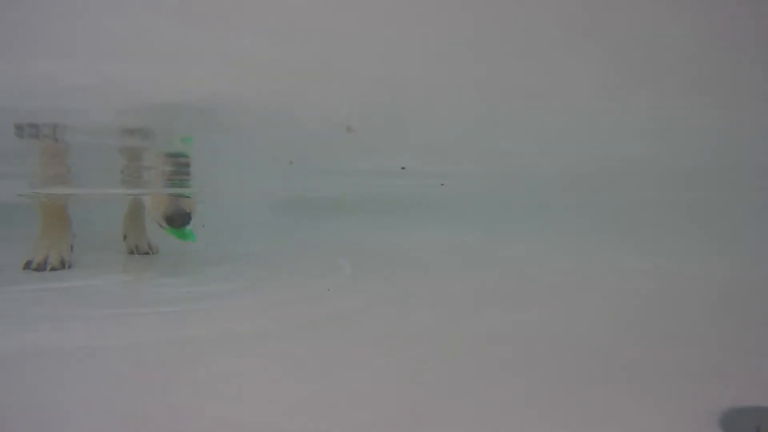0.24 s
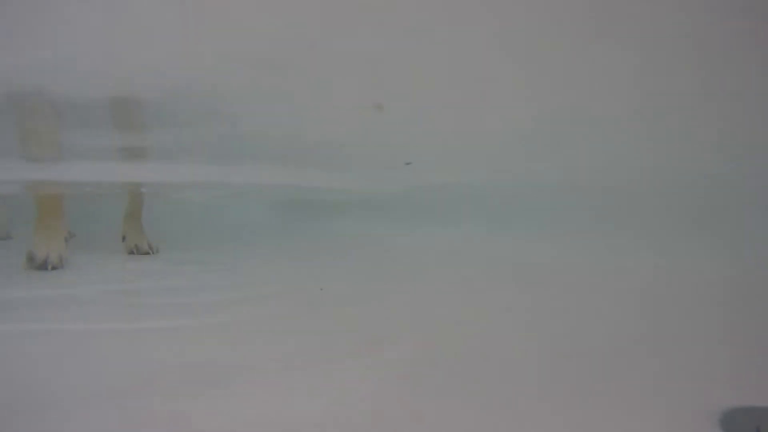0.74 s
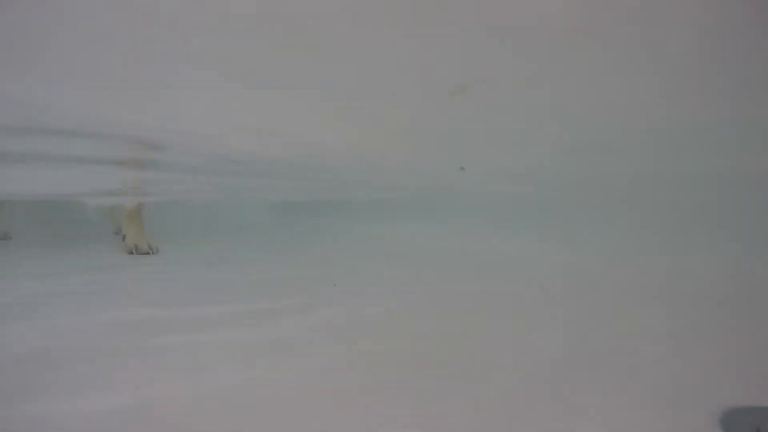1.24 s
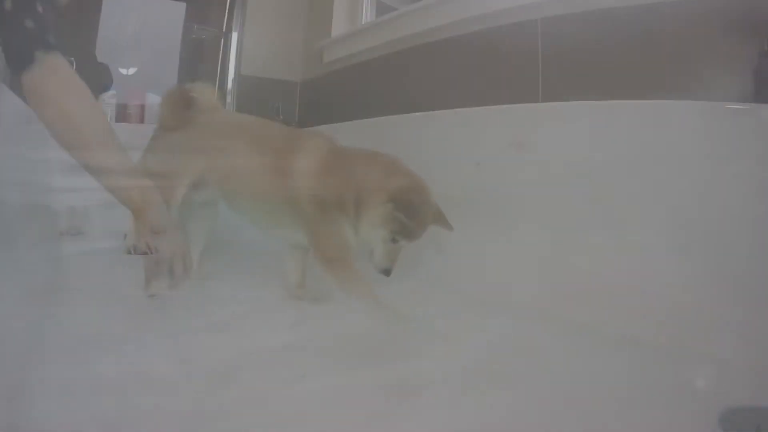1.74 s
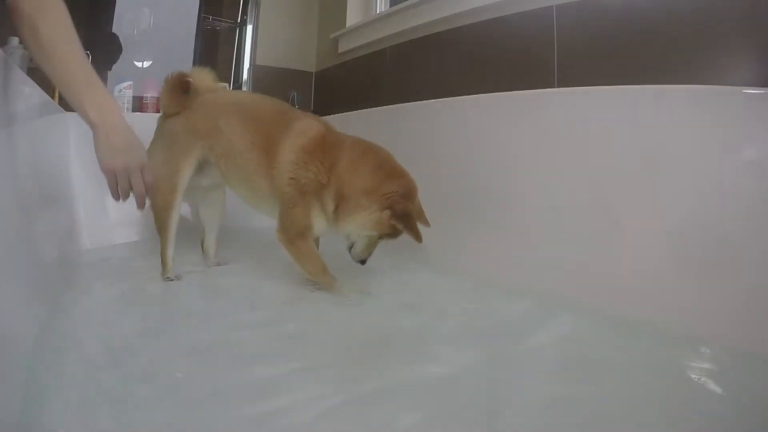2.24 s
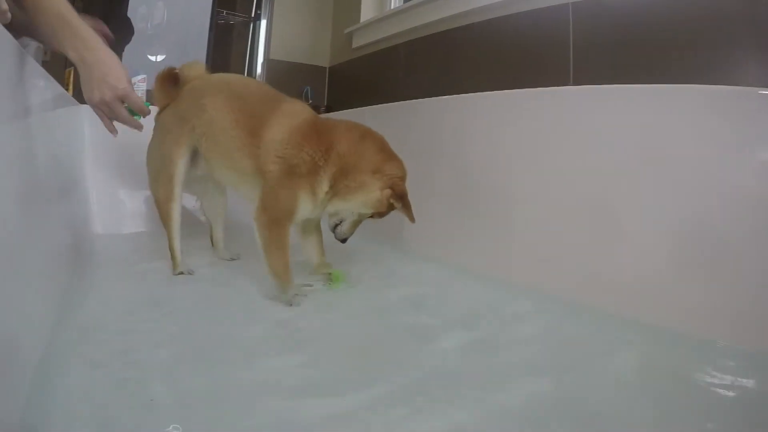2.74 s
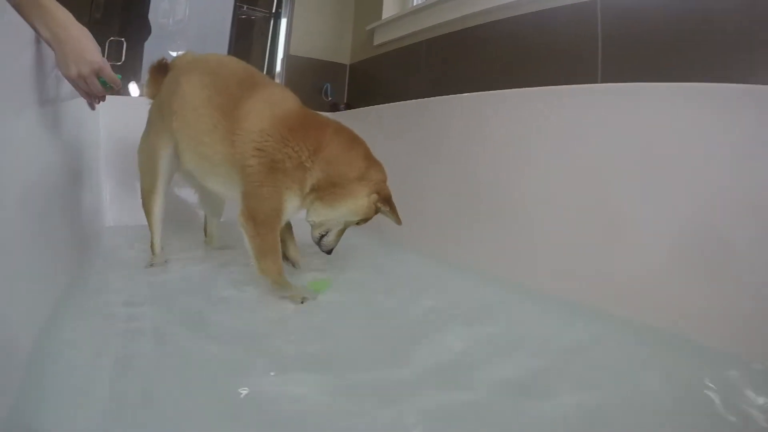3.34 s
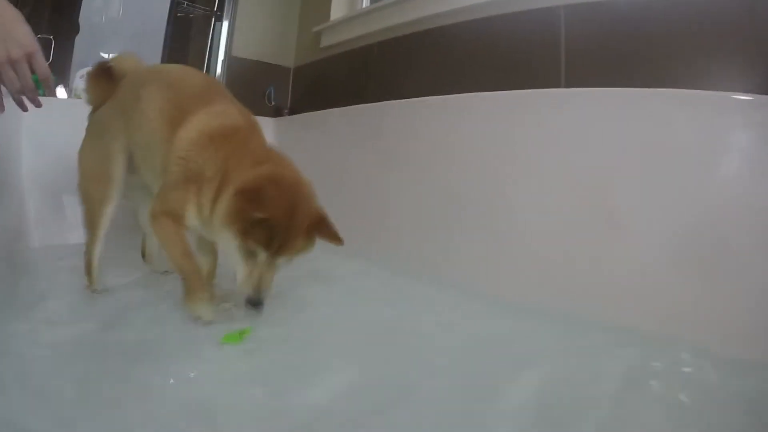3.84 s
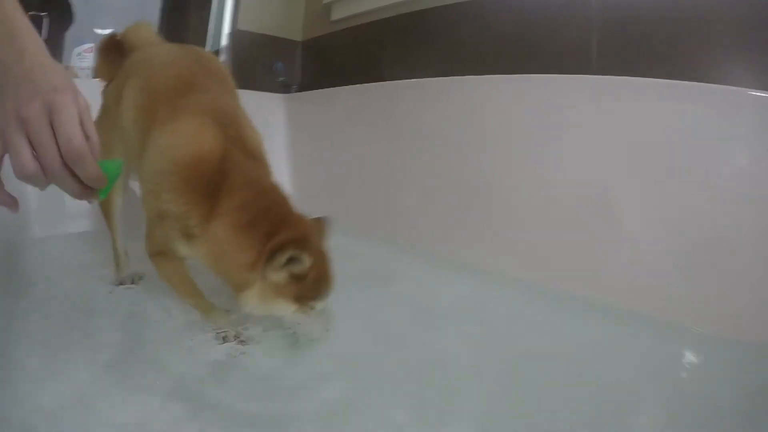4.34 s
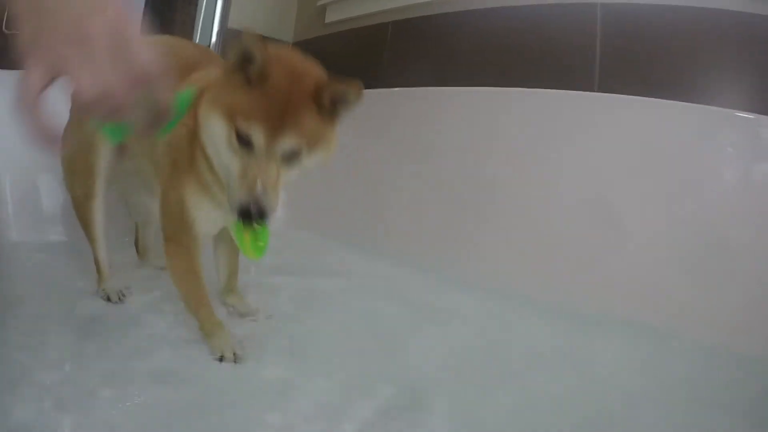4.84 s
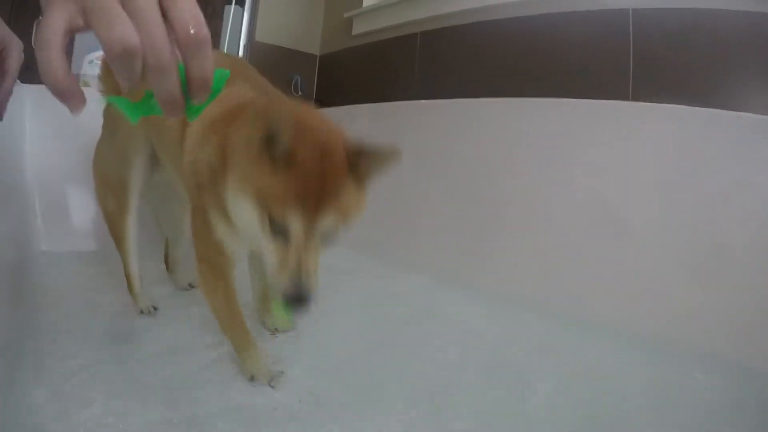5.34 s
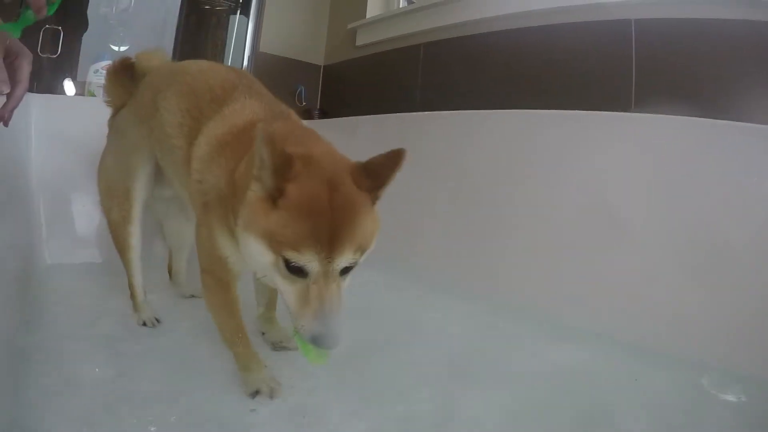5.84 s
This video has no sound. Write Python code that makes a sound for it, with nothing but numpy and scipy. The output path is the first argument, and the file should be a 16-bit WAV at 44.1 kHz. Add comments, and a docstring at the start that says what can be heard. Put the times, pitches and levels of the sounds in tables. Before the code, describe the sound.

Close, boxy and dull underwater-style pickup in a shallow bath. Low water rumble first, then a cluster of strong knocks and watery slops, loudest just before two seconds. Afterwards a motorised toy's tail chatters in a regular left-right rhythm, stumbling briefly as a paw catches it. Light sloshing, bubbles and faint hiss continue beneath; the clicking swells, and several hollow bumps from the dog's movements close the scene.

```python
"""Deep rumble, sloshing, faint dying tones and hiss come first; then a toy fish starts to clack.
Its motorised tail beats left and right about eleven times a second: hinge, shell and hollow body ring.
Random pushes ring thuds and plunks as a dog's paws bump the tub and water slops on a sealed case.
Moving water is banded noise with common surges; bubbles are rising sines, droplets bursts of noise.
All but a few thin snaps is dull, with almost nothing above about 3.9 kHz."""
import sys
import numpy as np
from scipy import signal
from scipy.fft import rfft, irfft
from scipy.io import wavfile
from scipy.ndimage import uniform_filter1d

SR = 44100
rng = np.random.default_rng(int(sys.argv[2]) if len(sys.argv) > 2 else 0)


def store_pcm(level_fs):
    """Save levels as 16-bit WAV."""
    pcm = np.round(np.clip(level_fs, -1, 1) * 32767).astype(np.int16)
    wavfile.write(sys.argv[1], SR, np.atleast_2d(pcm).T)


N = 269451

# Hinge modes: side (0 or 1), ratio to click pitch, mean level/dB
HINGE_MODES = [(0, .76, -12), (0, .87, 3.5), (0, 1, 4.5), (0, 1, -4), (0, 1.31, -5.5), (1, .83, -6),
               (1, 1.4, -4), (1, 1, 6.5), (1, 1.2, -13)]
# Hollow-body modes, one row a side: nominal f/Hz, nominal f/Hz
BODY_MODES_HZ = [(235, 394.5), (270, 500)]
# Tail strokes, one row a side: click level/dB, click f/Hz, shell level/dB, shell f/Hz, body level/dB
# (all nominal)
STROKES = [(-47, 2580, -38.5, 671, -38.5), (-47.5, 2670, -44, 819, -51)]
# Toy louder as it comes nearer: t/s, level/dB
NEARNESS_DB = [(.82, -34), (.9, -46), (1.01, -26), (1.1, -20), (1.45, -12.5), (2.35, -9.5), (2.6, -20.5),
               (2.84, 0), (3.8, -5), (4.3, 1), (4.8, 2.5), (5.15, 2.5), (6.05, 6)]
# Beat stumbles as a paw catches the toy: t/s, lateness/s
STUMBLE_S = [(.83, -.008), (1.08, -.002), (2.6, 0), (2.767, -.021), (2.849, .009), (2.943, 0)]
# Slops and bumps: t/s, spread/s, push level/dB, thud level/dB, thud f/Hz, plunk level/dB, plunk f/Hz,
# slap level/dB (levels before the trims in knocks())
KNOCK_EVENTS = [(.394, 0.002, -70, -46.5, 488, -42.5, 513, -61),
                (0.823, 0.008, -49.5, -43, 300, -51.5, 500, -56),
                (0.86, 0.0013, -40, -36.5, 172, -55, 501, -67),
                (1.038, .0013, -34, -23, 497, -31.5, 515, -47),
                (1.277, .0013, -19.5, -20.5, 226, -39, 525, -47),
                (1.292, 0.011, -37, -29, 215, -25, 544, -43.5),
                (1.308, 0.0043, -24.5, -17.5, 298, -23.5, 640, -35),
                (1.322, 0.004, -27.5, -17.5, 222, -15.5, 494, -34),
                (1.336, 0.0038, -25.5, -23, 249, -25.5, 616, -34),
                (1.378, 0.014, -36, -41, 240, -35.5, 524, -43),
                (1.432, 0.0045, -57.5, -36, 202, -49.5, 566, -50),
                (1.629, 0.0036, -35, -29.5, 200.5, -38, 616, -65.5),
                (1.651, 0.006, -33, -23.5, 204, -29, 665, -40.5),
                (1.711, .0017, -51, -43.5, 295, -25.5, 564, -52),
                (1.725, 0.003, -38, -28, 250, -27.5, 735, -42),
                (1.737, 0.0011, -23.5, -17.5, 238, -28.5, 501, -36.5),
                (1.742, 0.0011, -25.5, -21.5, 244, -31, 675, -44),
                (1.752, 0.0087, -32.5, -28, 432, -35, 657, -44.5),
                (1.778, .0033, -27.5, -37, 161, -42, 527, -47),
                (1.863, 0.0012, -13.5, -8.5, 202, -26, 501, -27.5),
                (1.91, 0.0009, -14, -8.5, 217, -13.5, 522, -24),
                (1.917, .0004, -50, -15, 350, -44, 727, -48),
                (2.019, 0.0099, -48, -37, 476, -28.5, 733, -49),
                (2.039, 0.0056, -45, -40, 269, -28.5, 687, -43.5),
                (2.094, 0.0023, -34, -26.5, 354, -26, 660, -36.5),
                (2.119, 0.0014, -60, -63, 480, -29, 616, -59),
                (2.146, 0.0044, -46, -39.5, 300, -32, 570, -50),
                (2.176, 0.0053, -63.5, -38, 253, -30.5, 588, -50.5),
                (2.324, 0.0024, -58, -40.5, 260, -34.5, 690, -58),
                (2.392, 0.0064, -52, -28, 394, -35.5, 697, -54.5),
                (2.46, 0.016, -52, -41.5, 313, -41.5, 725, -52),
                (2.659, 0.013, -58, -50, 495, -40.5, 557, -56),
                (2.7, 0.0073, -65, -45, 345, -40, 628, -49.5),
                (2.801, 0.0029, -64, -46, 302, -43, 595, -73),
                (3.228, 0.0072, -44.5, -42.5, 214, -56, 510, -72),
                (3.57, 0.0073, -69, -40.5, 195, -52, 690, -56.5),
                (3.874, 0.019, -54, -46.5, 242, -49.5, 592, -63),
                (4, 0.0017, -55, -37.5, 279, -41, 694, -64), (4.117, 0.0024, -62, -47, 258, -41, 670, -57),
                (4.146, 0.0014, -37, -33.5, 183, -66, 501, -67),
                (4.325, 0.027, -52, -43.5, 243, -56.5, 870, -56),
                (4.479, 0.0025, -30, -49, 408, -47.5, 670, -61),
                (4.672, 0.0067, -73, -43, 280, -46.5, 654, -62),
                (5.033, 0.0024, -72.5, -45.5, 314, -47.5, 507, -65.5),
                (5.159, .004, -25.5, -42.5, 476, -26.5, 680, -56),
                (5.179, 0.0097, -35, -40.5, 237, -38.5, 508, -64),
                (5.252, 0.0097, -49, -40, 366, -40, 780, -59),
                (5.343, 0.0029, -59, -43, 217, -40, 740, -58),
                (5.378, 0.0048, -46, -28.5, 170, -30, 665, -66),
                (5.388, 0.0097, -39, -29, 213, -42.5, 650, -67),
                (5.6, 0.0032, -38, -35.5, 227, -41.5, 680, -70),
                (5.764, 0.0072, -46.5, -18.5, 197.7, -31.5, 725, -52),
                (5.777, 0.0019, -38, -37, 230, -19, 630, -71), (5.861, .0036, -43, -32, 219, -26, 710, -48),
                (5.875, 0.0035, -40, -16, 399, -11.5, 477, -38),
                (5.892, 0.0052, -31, -23, 240, -34, 523, -56),
                (5.997, 0.0033, -48.5, -27.5, 197, -40.5, 680, -62.5),
                (6.029, 0.0042, -51, -26.5, 234.5, -21, 766, -50),
                (6.059, 0.0049, -46, -24, 418, -29.5, 547, -48.5),
                (6.086, 0.003, -32, -28.5, 390, -35.5, 675, -59)]
# Colour of tub and case: f/Hz, level/dB
CASE_COLOUR = [(25, -1.5), (100, -15.5), (200, 9), (290, 2.5), (390, 5), (520, -1), (680, 8), (840, -9),
               (980, -5), (1120, -16), (1300, -16), (1650, -28), (1950, -29), (3800, -38.5)]
# Moving water: t/s, rumble level/dB, slosh level/dB (before layer trims)
WATER_LEVELS = [(0.0, -47.5, -67), (0.13, -53.5, -63), (0.37, -54, -65.5), (0.61, -64.5, -61.5),
                (0.85, -74, -65), (1.09, -68, -52.5), (1.21, -51.5, -44.5), (1.38, -58, -47),
                (1.65, -51, -41), (1.8, -41.5, -21.5), (1.96, -45.5, -39), (2.18, -61.5, -47),
                (2.64, -62, -50.5), (2.98, -58, -58.5), (3.66, -64, -55), (3.95, -61, -52.5),
                (4.08, -55.5, -51), (4.25, -56, -52), (4.71, -63.5, -57), (5.07, -67, -60.5),
                (5.31, -58, -49), (5.55, -58.5, -54.5), (5.72, -60, -52), (5.87, -49.5, -52),
                (6.01, -53, -49.5), (6.11, -50, -37)]
# Colour of water in the tub: f/Hz, relative level/dB
SLOSH_COLOUR = [(20, 16), (40, -8), (70, -20.5), (124, -13), (215, -7.5), (300, -11.5), (380, -14),
                (520, -12.5), (700, -9.5), (880, -21), (1000, -15.5), (1130, -27.5), (1300, -23.5),
                (1800, -34.5)]
# Wavelets lapping on the case, brightening the water: t/s, level/dB
LAPPING_DB = [(0, 9.5), (.9, -4.5), (1.3, 2.5), (2.1, 3.5), (2.8, 2), (4.4, 1), (5.3, -2.5), (6.11, -5.5)]
# Drops and small splashes on the case: t/s, level/dB, band centre f/Hz
DROP_EVENTS = [(.73, -63, 2600), (.818, -62, 2700), (1.102, -60, 3340), (1.457, -61, 3320),
               (1.812, -52, 3080), (2.353, -55.5, 2750), (4.121, -57.5, 3880), (4.363, -59, 3700)]
# Thin sharp snaps, bright beyond 3.9 kHz: t/s, level/dB
SNAP_EVENTS = [(.481, -70), (1.037, -57), (2.391, -74)]
# Faint dying tones: f/Hz, initial level/dB, t60/s
RING_TONES = [(455, -40, 0.4), (460, -51, .8), (682, -46, 0.32), (752, -56, 0.4)]
# Deepest rumble, strong at first under water: t/s, mean level/dB
DEEP_DB = [(0, -44.5), (.28, -45), (.55, -51.5), (.66, -71), (1.9, -50.5), (2.3, -67.5), (4.3, -65),
           (4.5, -52), (6.11, -65)]
# Hiss, dipping twice early on: t/s, mean level/dB
HISS_DB = [(0, -69), (.5, -69.5), (.6, -81.5), (.75, -66), (.82, -78), (.92, -78), (1.018, -72.5),
           (1.3, -65), (2, -69), (3, -67.5), (5, -68), (6.11, -66.5)]
# Colour of hiss and droplets: f/Hz, relative level/dB
HISS_TILT = [(600, -4.5), (1000, 2.5), (1700, -3), (3800, -8.5)]

# Toy: first stroke, full beat, delay of the return stroke
TAIL_START_S, BEAT_S, RETURN_S = .733, .17626, .094
CLICK_DETUNE, SHELL_DETUNE = .03, .035  # standard deviation, share of pitch
STROKE_SCATTER_DB, MODE_SCATTER_DB = 1.2, 3.5  # standard deviation
LOW_SHARE = 0.49  # share of the nearness dB followed by shell and body
# Knocks: splash relative to slap, more for a sharp push; case ring relative to slap
SPLASH_DB, SHARP_DB = -22.5, 25
CASE_RING_HZ, CASE_RING_DB = 1990, -21
# Water: layer trims; cap on the slosh level before trim; bubbles relative to uncapped slosh
RUMBLE_DB, SLOSH_DB, RIPPLE_DB, LAP_DB = 5.5, 0, -8, -17
SLOSH_TOP_DB, BUBBLE_DB = -36.5, -3.5
LIFT_S, CLEAR_S = 1.05, 2.6  # case lifted out of the bath between these times
DULL_EDGE_HZ, EDGE_HZ = 3900, 15800  # low-pass edges: dull sounds, output


def amp(db):
    """Decibels to gain."""
    return 10 ** (np.asarray(db) / 20)


def evened(x):
    """Scales to rms 1."""
    return x / np.sqrt(np.mean(x ** 2) + 1e-20)


def crested(x):
    """Scales so that the loudest 5 ms have rms 1."""
    return x / np.sqrt(uniform_filter1d(x ** 2, size=220).max() + 1e-20)


def noise(count):
    """White Gaussian noise."""
    return rng.standard_normal(count)


def curve(t_s, table):
    """Interpolates a two-column table linearly."""
    return np.interp(t_s, *np.transpose(table))


def centred_time(half):
    """Time/s of 2 * half samples, zero in the middle."""
    return np.arange(-half, half) / SR


def add(mix, at_s, sound):
    """Mixes in a sound whose middle falls at at_s."""
    start = round(at_s * SR) - len(sound) // 2
    part = mix[start:start + len(sound)]
    part += sound[:len(part)]


def band(x, lo_hz, hi_hz, colour):
    """Band-passes x and shapes it by a (f/Hz, level/dB) colour, interpolated in log frequency."""
    hz = np.fft.rfftfreq(len(x), 1 / SR) + 1e-3
    colour_hz, colour_db = np.transpose(colour)
    edges = 1 / (1 + (lo_hz / hz) ** 8) / (1 + (hz / hi_hz) ** 12)
    gain = amp(np.interp(np.log(hz), np.log(colour_hz), colour_db))
    return irfft(rfft(x) * edges * gain, len(x))


def drift(rate_hz):
    """Slow random wander of rms 1."""
    hz = np.fft.rfftfreq(N, 1 / SR)
    return evened(irfft(rfft(noise(N)) * np.exp(-(hz / rate_hz) ** 2), N))


def swell(t, rise, decay):
    """Soft rise to t = 0, then exponential decay; rise and decay in s."""
    before = -.5 * (np.minimum(t, 0) / rise) ** 2
    after = -(np.hypot(np.maximum(t, 0), rise) - rise) / decay
    return np.exp(before + after)


def mode(t, hz):
    """Sine of random phase."""
    return np.sin(2 * np.pi * (hz * t + rng.random()))


def toy():
    """Each stroke chatters the hinge for a few ms; shell and hollow body ring slightly later."""
    out, t = np.zeros(N), centred_time(2048)
    beats_s = np.arange(TAIL_START_S, N / SR, BEAT_S)
    strokes = [(s + side * RETURN_S, side) for s in beats_s for side in (0, 1)]
    for at_s, side in strokes[:-1]:  # the last falls past the end
        click_db, click_hz, shell_db, shell_hz, body_db = STROKES[side]
        near_db, late_s = curve(at_s, NEARNESS_DB), curve(at_s, STUMBLE_S)
        force, click_off, shell_off = noise(3)
        click_hz = click_hz * (1 + CLICK_DETUNE * click_off)
        shell_hz = shell_hz * (1 + SHELL_DETUNE * shell_off)

        # hinge modes trade strength from stroke to stroke
        hinge = sum(amp(db + MODE_SCATTER_DB * rng.standard_normal())
                    * mode(t, click_hz * ratio * rng.uniform(1.0, 1.02))
                    for mode_side, ratio, db in HINGE_MODES if round(mode_side) == side)
        grit = evened(band(noise(len(t)), 1900, 4300, [(2000, 1.0), (2900, 4.5), (4000, -19.5)]))
        click = (evened(hinge) + amp(-2.5) * grit) * np.exp(-.5 * (t / 0.0032) ** 2)

        shell = mode(t, shell_hz) + amp(-13.5) * mode(t, shell_hz * 1.307)
        shell = shell * swell(t - .0015, rise=0.0021, decay=0.0045)
        body = sum(mode(t, hz * rng.uniform(0.889, 1.1)) for hz in BODY_MODES_HZ[side])
        body = body * swell(t - .004, rise=0.004, decay=0.0044)
        wake = band(noise(len(t)), 380, 1600, CASE_COLOUR) * swell(t - .008, rise=0.0025, decay=0.0025)
        low = amp(body_db - 5.0) * crested(body)
        low = low + amp(shell_db) * (crested(shell) + amp(-10.0) * crested(wake))

        stroke = amp(click_db + near_db) * crested(click) + amp(LOW_SHARE * near_db) * low
        add(out, at_s + late_s, amp(STROKE_SCATTER_DB * force) * stroke)
    return out


def knocks():
    """A short knock is one push, a longer slop a scatter; each rings a low thud and a higher plunk."""
    out, t = np.zeros(N), centred_time(4096)
    for at_s, spread_s, push_db, thud_db, thud_hz, plunk_db, plunk_hz, slap_db in KNOCK_EVENTS:
        loose = min(spread_s / 0.00156, 1)  # 0 = single push, 1 = scatter
        push = np.exp(-.5 * (t / .00007) ** 2)
        scatter_env = swell(t, rise=0.00089 + spread_s * 1.69, decay=0.00041 + spread_s * 0.93)
        scatter = noise(len(t)) * scatter_env
        tail = noise(len(t)) * swell(t - .004, rise=0.0011, decay=0.025)
        force = (1 - loose) * evened(push) + (loose + 0.083) * evened(scatter) + amp(-27) * evened(tail)

        # minimum rise and decay scale with the mode's period
        thud = mode(t, thud_hz) * swell(t, rise=max(spread_s * 1.1, 0.86 / thud_hz),
                                        decay=max(spread_s * 1.3, 0.23 / thud_hz))
        plunk = mode(t, plunk_hz) * swell(t, rise=max(spread_s * .7, 1.1 / plunk_hz),
                                          decay=max(spread_s * 1.0, 0.79 / plunk_hz))
        case_ring = mode(t, CASE_RING_HZ) * swell(t, rise=.0012, decay=0.0022)

        push_part = crested(band(force, 31, 121.4, CASE_COLOUR))
        thud_part = crested(crested(thud) + amp(-0.5) * crested(band(force, 120, 480, CASE_COLOUR)))
        plunk_part = crested(crested(plunk) + amp(-4.5) * crested(band(force, 440, 950, CASE_COLOUR)))
        slap_part = crested(band(force, 937, 1700, CASE_COLOUR)) + amp(CASE_RING_DB) * crested(case_ring)
        splash_part = crested(band(force, 1650, 3900, CASE_COLOUR))
        splash_db = slap_db + SPLASH_DB + SHARP_DB * (1 - loose)
        knock = (amp(push_db - 3.5) * push_part + amp(thud_db - 1.58) * thud_part
                 + amp(plunk_db - 3.24) * plunk_part + amp(slap_db) * slap_part
                 + amp(splash_db) * splash_part)
        add(out, at_s, knock)
    return out


def water():
    """Rumble, slosh, ripples and lapping: noise bands with shared and separate random surges."""
    t, surge, wave = np.arange(N) / SR, drift(rate_hz=28), drift(rate_hz=10)
    level_s, *columns = np.transpose(WATER_LEVELS)
    rumble_db, slosh_db = (np.interp(t, level_s, column) for column in columns)
    slosh_db = np.minimum(slosh_db, SLOSH_TOP_DB)
    lapping_db = curve(t, LAPPING_DB)
    # low edge/Hz, high edge/Hz, level/dB, surge scale/dB
    layers = [(36, 106, rumble_db + RUMBLE_DB, 2.5),
              (131, 510, slosh_db + SLOSH_DB, 2.6),
              (470, 826, slosh_db + RIPPLE_DB + .5 * lapping_db, 3.0),
              (870, 1400, slosh_db + LAP_DB + lapping_db, 2.8)]
    out = np.zeros(N)
    for lo_hz, hi_hz, level_db, surge_db in layers:
        swing = surge + 1.18 * drift(rate_hz=29) + .5 * wave
        flow = band(noise(N), lo_hz, hi_hz, SLOSH_COLOUR) * amp(surge_db * swing)
        out += evened(flow) * amp(level_db)
    return out


def bubbles(count=130):
    """Small bubbles ring as decaying sines rising in pitch; their level follows the slosh."""
    level_s, _, slosh_db = np.transpose(WATER_LEVELS)
    out, t = np.zeros(N), centred_time(2048)
    for when, small, strength in rng.random((count, 3)):
        at_s, hz = .6 + when * 5.4, 330 * 2.9 ** small
        ping = mode(t, hz * (1 + 3.9 * t)) * swell(t, rise=0.00051, decay=2.5 / hz)
        level_db = np.interp(at_s, level_s, slosh_db) + 7.9 * strength - 10 * small + BUBBLE_DB
        add(out, at_s, amp(level_db) * ping)
    return out


def spatter(count=14):
    """Droplets tick on the case as narrow noise bursts; stray ones fall while it is lifted out."""
    out, t = np.zeros(N), centred_time(1024)
    strays = [(LIFT_S + (CLEAR_S - LIFT_S) * when, -66 + 7 * strength, 2400 + 1100 * size)
              for when, size, strength in rng.random((count, 3))]
    for at_s, level_db, hz in list(DROP_EVENTS) + strays:
        tick = band(noise(len(t)), hz, hz, HISS_TILT) * swell(t, rise=0.0027, decay=0.0074)
        add(out, at_s, amp(level_db) * crested(tick))
    return out


def snaps():
    """Bright noise bursts with sub-millisecond rise and decay."""
    out, t = np.zeros(N), centred_time(512)
    for at_s, level_db in SNAP_EVENTS:
        burst = noise(len(t)) * swell(t, rise=.0001, decay=0.00027)
        snap = band(burst, 2000, 15000, [(3000, -1), (14000, -17)])
        add(out, at_s, amp(level_db) * crested(snap))
    return out


def ring():
    """A few faint sines die away exponentially after a 3 ms fade-in."""
    t = np.arange(N) / SR
    tones = sum(amp(db - 60 * t / t60_s) * mode(t, hz) for hz, db, t60_s in RING_TONES)
    return tones * np.minimum(t / 0.003, 1)


def deep_rumble():
    """Noise round 32-36 Hz, slowly wandering in level."""
    level_db = curve(np.arange(N) / SR, DEEP_DB) + 2 * drift(rate_hz=6.8)
    return amp(level_db) * evened(band(noise(N), 32, 36, SLOSH_COLOUR))


def hiss():
    """A floor of banded noise, wandering slightly in level."""
    level_db = curve(np.arange(N) / SR, HISS_DB) + 1.5 * drift(rate_hz=20)
    return amp(level_db) * evened(band(noise(N), 490, 4100, HISS_TILT))


def scene():
    """Sums all sources; a low-pass dulls everything but the snaps."""
    bath = toy() + knocks() + water() + bubbles() + spatter() + ring() + deep_rumble() + hiss()
    dull_filter = signal.firwin(301, DULL_EDGE_HZ, window=("kaiser", 7), fs=SR)
    return (signal.oaconvolve(bath, dull_filter, "same") + snaps())[None]


def record(dry):
    """Loud swings crackle faintly, peaks are cut off flat, then the output is low-passed."""
    sound = dry[0]
    # high-passed steps: a tick at each threshold crossing
    ticks = band(np.sign(sound) * (abs(sound) > .075), 2700, 18000, [(4000, 0.5), (16000, -1)])
    grit = evened(band(noise(N), 3900, 14000, [(4000, 8.5), (8000, -6.0), (16000, -11.0)]))
    excess = np.maximum(abs(sound) - .11, 0)
    crackle = amp(-65.5) * ticks + amp(-44.5) * excess * grit + amp(-99) * noise(N)
    clipped = np.clip(sound + crackle, -.71, .71)[None]
    edge_filter = signal.firwin(511, EDGE_HZ, window=("kaiser", 9), fs=SR)
    return signal.oaconvolve(clipped, edge_filter[None], "same")


dry = scene()
out = record(dry)
store_pcm(out)
```